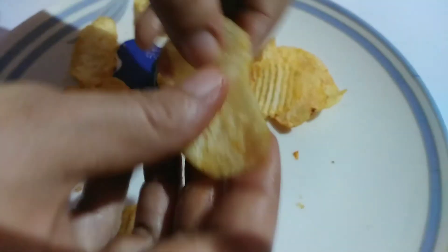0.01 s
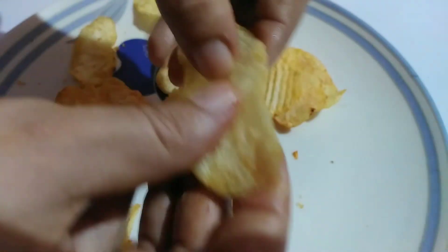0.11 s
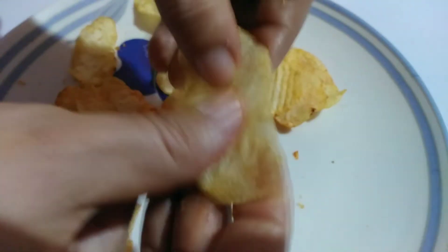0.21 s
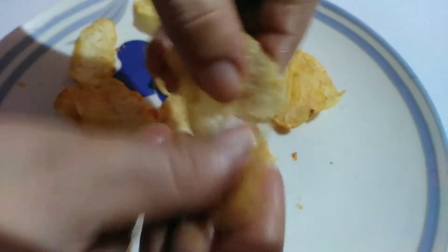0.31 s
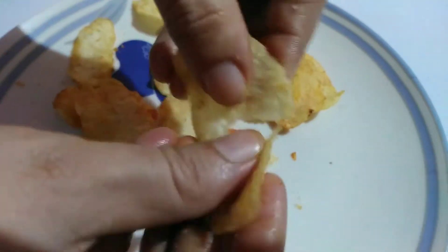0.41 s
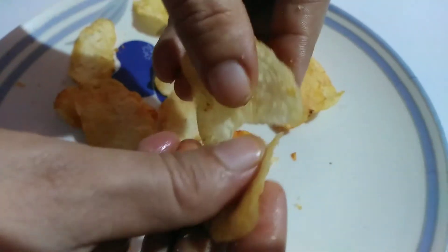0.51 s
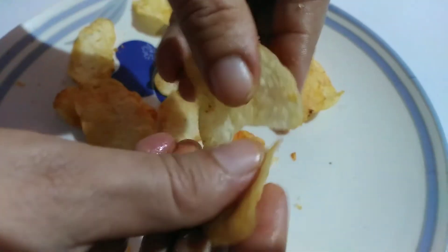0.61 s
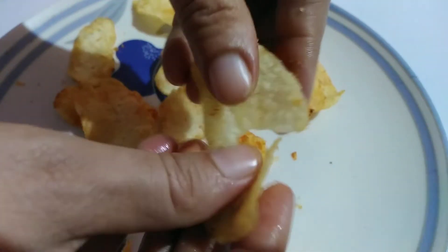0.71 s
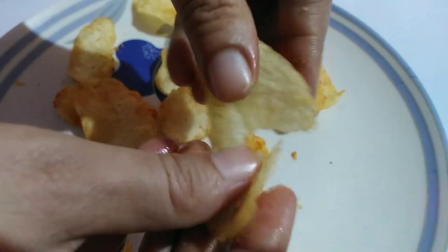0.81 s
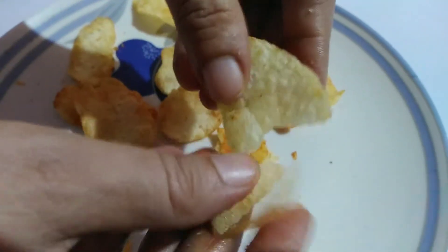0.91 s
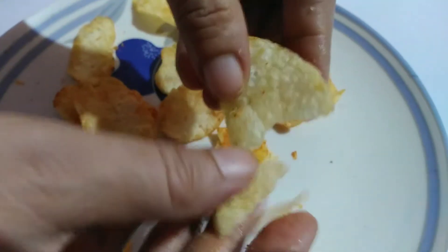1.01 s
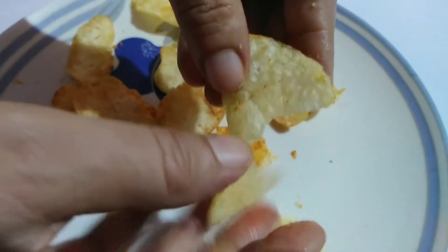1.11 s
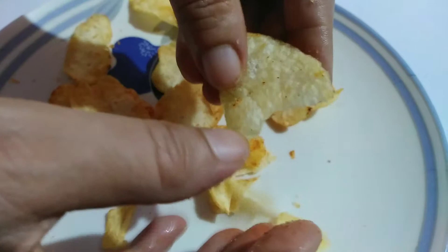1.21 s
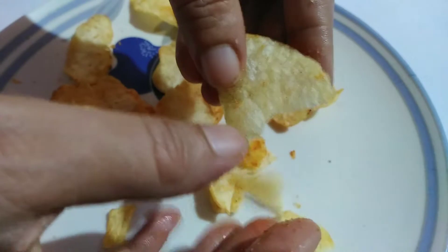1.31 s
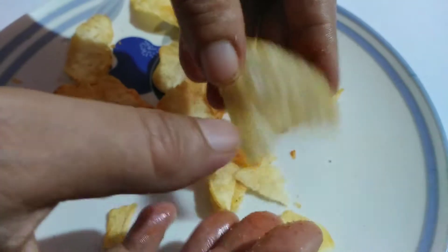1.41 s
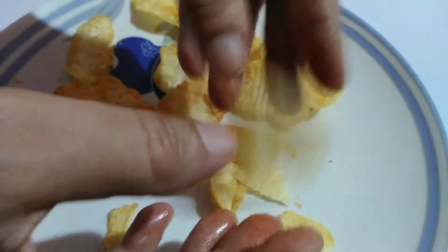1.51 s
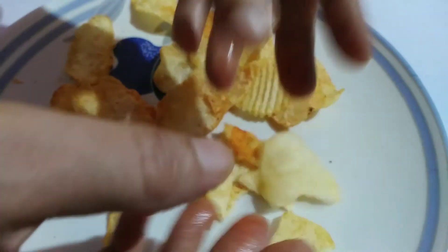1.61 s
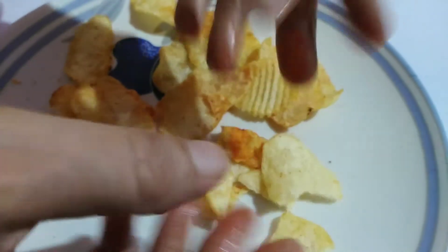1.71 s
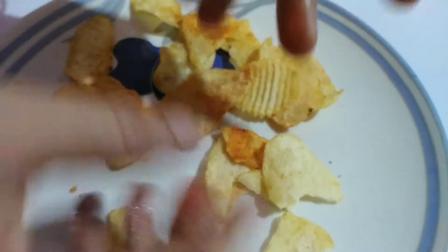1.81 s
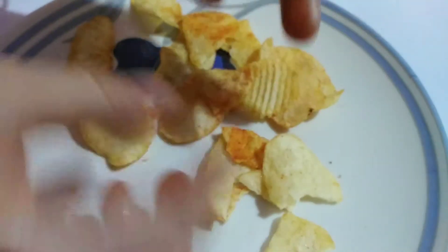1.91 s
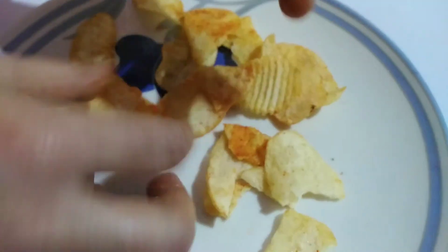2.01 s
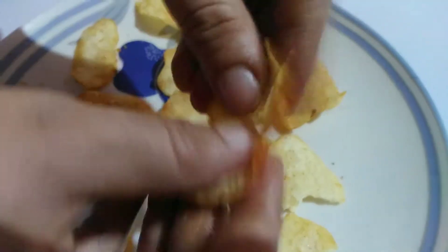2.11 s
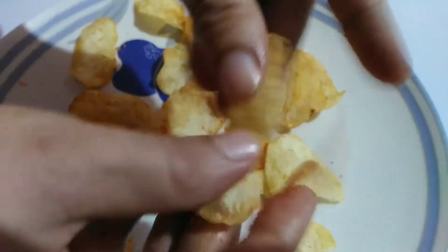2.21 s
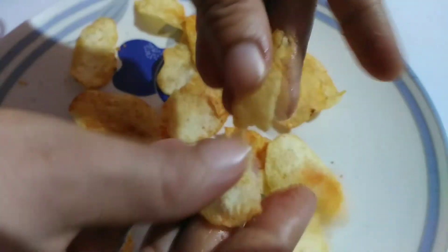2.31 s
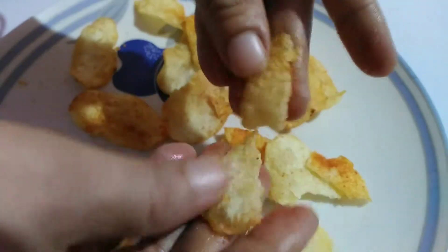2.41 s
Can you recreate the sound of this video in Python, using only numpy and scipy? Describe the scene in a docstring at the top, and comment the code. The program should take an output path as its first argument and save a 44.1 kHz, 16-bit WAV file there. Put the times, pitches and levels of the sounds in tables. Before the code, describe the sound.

A crisp chip snaps close to the microphone at about 0.25 seconds, a quick brittle crunch followed by a bright rustle. It creaks faintly between the fingers near 0.9 seconds. Pieces clatter lightly onto a plate from 1.1 to 1.7 seconds, and again from 2.3 seconds. The hands bump softly now and then, and a faint low motor hum runs behind in the small room.

```python
"""A crisp fried chip is snapped by hand just above a plate, close to the microphone in a small room.
After a faint rub it breaks at 0.25 s: a quick run of brittle fractures rings its damped modes.
A bright rustle follows; near 0.9 s it creaks between the fingers by stick-slip. Pieces then clatter,
mostly at 1.1-1.7 s and again from 2.3 s, each impact ringing both piece and plate.
Throughout, the hands bump softly now and then, and a motor hums faintly behind."""
import sys
import numpy as np
from scipy import signal
from scipy.fft import rfft, irfft
from scipy.io import wavfile
from scipy.ndimage import uniform_filter1d, minimum_filter1d

SR = 44100
rng = np.random.default_rng(int(sys.argv[2]) if len(sys.argv) > 2 else 0)


def wav_out(sig):
    """Save sig, one row per channel (or a flat mono array), as 16-bit PCM at SR to the path in sys.argv[1]."""
    wavfile.write(sys.argv[1], SR, np.round(np.clip(np.atleast_2d(sig).T, -1, 1) * 32767).astype(np.int16))


N = 110250
CHIP_T60_S = 0.021  # ringing of the cracked chip and of its crumbs


def amp(db):
    """Amplitude ratio of a level in decibels."""
    return 10 ** (np.asarray(db) / 20)


def unit(x):
    """Normalisation to rms 1."""
    return x / np.sqrt(np.mean(x ** 2))


def curve(points, hz):
    """Interpolation of (frequency [Hz], value) points on a logarithmic frequency axis."""
    p = np.array(points)
    return np.interp(np.log(hz + 1), np.log(p[:, 0]), p[:, 1])


def bins(size):
    """Frequencies [Hz] of a real Fourier transform."""
    return np.arange(size // 2 + 1) * SR / size


def colour(x, db):
    """Minimum-phase filter with a gain [dB] per bin, made causal by folding the cepstrum."""
    n = x.shape[-1]
    cepstrum = irfft(np.log(amp(db)), n)
    cepstrum[1:n // 2] *= 2
    cepstrum[n // 2 + 1:] = 0
    return irfft(rfft(x) * np.exp(rfft(cepstrum)), n)


def shape(x, db):
    """Whitening and filtering: a new spectral envelope [dB] that keeps the fine resonances."""
    power = uniform_filter1d((abs(rfft(x)) ** 2).mean(0), size=x.shape[1] // 64)
    return colour(x, db - 10 * np.log10(power))


def shelves(hz, body_db, treble_db, body_hz=3460, treble_hz=6750):
    """Size sets the spectrum [dB]: big pieces radiate more body, small splinters more treble."""
    return body_db / (1 + (hz / body_hz) ** 6) + treble_db / (1 + (treble_hz / (hz + 1)) ** 6)


def fade(t, t60):
    """Exponential damping, 60 dB in t60 seconds."""
    return np.exp(-np.log(1000) * t / t60)


def swell(middle, length):
    """Gaussian envelope, 17 dB down at both ends of its length [s]."""
    return np.exp(-2 * ((np.arange(N) / SR - middle) / (length / 2)) ** 2)


def add(out, x, start, db, pan_db=0):
    """Superposition of a stereo transient; its level is that of its energy packed into 4 ms."""
    x = x / np.sqrt((x ** 2).sum(1, keepdims=True) / (.004 * SR))
    gains = amp(db + np.array([[pan_db], [-pan_db]]) / 2)
    i = int(start * SR)
    out[:, i:i + x.shape[1]] += (x * gains)[:, :N - i]


def flake(t, t60, count=50, gap_hz=329.5, mic_spread_rad=1.945):
    """Bending modes of a thin flake: about evenly spaced, damped, phased apart at the microphones."""
    detune, strength, damping, mic_phase = rng.standard_normal((4, count, 1))
    hz = gap_hz * (np.arange(count)[:, None] + 1 + 0.28 * detune)
    phase = 2 * np.pi * hz * t + rng.uniform(0, 2 * np.pi, (count, 1))
    envelopes = amp(strength) * fade(t, t60 * np.exp(.2 * damping))
    return np.array([(envelopes * np.sin(phase + p)).sum(0) for p in (0, mic_spread_rad * mic_phase)])


def cracks(size=2048, jump_count=10):
    """Brittle fracture: each crack advances in tiny jumps, impulses that excite the chip's modes."""
    # cracks in the chip: (time [s], level [dB], duration [s], body [dB], treble [dB])
    fractures = [(0.2308, -39, 0.00024, -9, 11), (0.2435, -13.5, 0.00051, -9.5, -11),
                 (0.251, -6.5, 0.0012, -4, 0.5), (0.2546, -30, 0.0011, 0, -14),
                 (0.262, -19.5, 0.011, -8, -16), (0.2725, -12, 0.0024, 0, 5.5),
                 (0.2782, -20.5, 0.0019, -2.5, 2), (0.2925, -20.5, 0.0028, -4.5, -30),
                 (0.556, -45, 0.0019, 12, 5.5), (0.596, -38.5, .001, -55, 7), (1.249, -37, 0.002, -8, 4),
                 (1.308, -38.5, 0.0025, -10, 19), (2.118, -50.5, 0.00053, -5, 20.5)]
    # spectral envelope of a crack: (frequency [Hz], gain [dB])
    spectrum = [(130, -35), (450, -20.5), (1000, -13), (1500, -9), (3000, -2.5), (5500, -1.5), (8000, -4),
                (15000, -15.5)]
    out, t, hz = np.zeros((2, N)), np.arange(size) / SR, bins(size)
    for start, db, length, body, treble in fractures:
        jumps = np.zeros(size)
        jump_s = (np.arange(jump_count) + rng.random(jump_count)) / jump_count * length
        jumps[(jump_s * SR).astype(int)] = rng.choice([-1, 1], jump_count)
        ringing = irfft(rfft(flake(t, CHIP_T60_S)) * rfft(jumps))
        add(out, shape(ringing, curve(spectrum, hz) + shelves(hz, body, treble)), start, db)
    return out


def ring(t, hz, t60):
    """Damped oscillator: one mode, in quadrature at the two microphones."""
    phase = 2 * np.pi * hz * t + rng.uniform(0, 2 * np.pi) + np.array([[0], [np.pi / 2]])
    return unit(np.sin(phase) * fade(t, t60))


def taps(size=2048, contact_s=0.00042, ring_db=-4.5, crumb_count=7, crumb_db=-17.5, settle_s=0.048):
    """Impact excitation: a landing piece rings, one mode above the rest; then crumbs settle."""
    # pieces hitting the plate and each other: (time [s], level [dB], low edge of the modes [Hz],
    # body [dB], treble [dB], strong mode [Hz], left minus right [dB])
    impacts = [(0.636, -46.5, 2000, -10, 13, 5510, -5.5), (1.0750, -17.5, 1247, 8, -4, 5160, -5.5),
               (1.084, -26.5, 1350, -13, -6, 5170, 12.5), (1.1085, -24.5, 1370, 4.5, 7.5, 2250, 3.5),
               (1.1742, -31.5, 1400, -8, 9.5, 5400, 2), (1.222, -39.5, 2200, -10, 2.5, 5030, -0.5),
               (1.257, -18.5, 2060, -7, -3, 5170, 0), (1.381, -32, 1810, -1.5, 5, 4560, -0.5),
               (1.5679, -23, 1975, 4, 2.5, 4760, -1), (1.5844, -21, 710, 6, 6.5, 4570, 2.5),
               (1.6180, -34, 1900, 9, 10, 2550, 1), (1.639, -14.5, 1580, 3.5, -1, 5245, -0.5),
               (1.6939, -29.5, 2280, 1.5, -2, 3250, 0), (1.7118, -34.5, 2230, 0, 0, 2330, 1.5),
               (2.2996, -30, 1560, 9, 12.5, 3070, -4.5), (2.3276, -30.5, 1400, 1, 7, 3160, -3),
               (2.3428, -22.5, 2350, -22, -5, 5750, 3.5), (2.4107, -23.5, 2070, -7.5, 10.5, 4580, -1),
               (2.4550, -33, 2040, -7.5, 2.5, 4470, 6)]
    # spectral envelope of a piece: (frequency [Hz], gain [dB])
    spectrum = [(150, -14.5), (600, -15.5), (1400, -9.5), (2400, 0.5), (3400, -1.5), (5300, -7),
                (7500, -13), (12000, -21), (15000, -33)]
    out, t, hz = np.zeros((2, N)), np.arange(size) / SR, bins(size)
    contact = 1 - np.exp(-t / contact_s)
    for start, db, low_hz, body, treble, ring_hz, pan in impacts:
        bass_cut_db = -17 / (1 + (hz / (.8 * low_hz)) ** 8)
        tone = curve(spectrum, hz) + shelves(hz, body, treble) + bass_cut_db
        piece = unit(shape(flake(t, t60=0.018) * contact, tone))
        strong_mode = amp(ring_db) * ring(t, ring_hz, t60=0.019)
        add(out, piece + contact * (strong_mode + plate(t, body, treble)), start, db, pan)
        for late in rng.random(crumb_count):  # later crumbs are softer
            crumb = shape(flake(t, CHIP_T60_S), tone - shelves(hz, body, 0))
            landing_s = min(start + late * settle_s, (N - 1) / SR)
            add(out, crumb, landing_s, db + crumb_db - 10 * late, pan)
    return out


def plate(t, body, treble, t60=0.044, detune=0.016):
    """Modal response of the plate: levels and pitches vary slightly with the spot that is hit."""
    # modes of the plate with chips lying on it: (frequency [Hz], relative level [dB])
    modes = [(620, -38), (1440, -22.5), (1860, -18), (2120, -19), (2490, -10.5), (5190, -13.5)]
    spot = rng.uniform(-1.13, 1, (len(modes), 2))
    return sum(amp(db + shelves(hz, body, treble) + louder_db) * ring(t, hz * (1 + detune * higher), t60)
               for (hz, db), (louder_db, higher) in zip(modes, spot))


def rubs():
    """Friction noise: skin drags over the rough crust in a fine crackle, loudest just after the snap."""
    # finger strokes: (centre time [s], duration [s], level [dB])
    strokes = [(-0.015, 0.16, -52.5), (0.35, 0.1502, -41), (0.669, 0.043, -56), (0.81, 0.068, -62.5),
               (2.125, 0.086, -63.5)]
    # tone of the bright, hissy rustle, strongest above 5 kHz: (frequency [Hz], gain [dB])
    rustle_tone = [(900, -12.5), (4700, 1.5), (5400, 10.5), (10000, 5), (15000, -1.5)]
    noise = rng.standard_normal((2, N))
    grains = np.repeat(rng.standard_normal(N // 40 + 1), 40)  # about 1 ms each
    roughness_db = 5 * uniform_filter1d(grains, size=8)[:N]
    crackle = unit(colour(noise * amp(roughness_db), curve(rustle_tone, bins(N))))
    return crackle * sum(amp(db) * swell(middle, length) for middle, length, db in strokes)


def slide(modes_hz=(3080, 3490), bandwidth_hz=170, db=-64):
    """Stick-slip friction: tiny slips of a fingertip excite two resonances of the chip."""
    slips = rng.standard_normal((2, N)) ** 3
    creak = sum(signal.lfilter(*signal.iirpeak(hz, hz / bandwidth_hz, fs=SR), slips) for hz in modes_hz)
    return unit(creak) * amp(db) * swell(middle=0.91, length=0.24)


def bumps(hz=58):
    """Soft impacts hold only low frequencies: dull thuds as the hands jerk and touch down."""
    # bumps of the hands: (centre time [s], duration [s], level [dB])
    thuds = [(0.281, 0.019, -48), (0.94, 0.07, -57.5), (1.706, 0.16, -64), (2.451, 0.12, -60)]
    t = np.arange(N) / SR
    return sum(amp(db) * swell(middle, length) * np.sqrt(2) * np.cos(2 * np.pi * hz * (t - middle))
               for middle, length, db in thuds)


def room(x, size=16384, bands=8, onset_s=0.0062, early_db=-7.5):
    """Reverberation: dense early reflections, then a short tail that lasts longest in the treble."""
    # decay of the room: (frequency [Hz], reverberation time [s])
    decay = [(2000, 0.12), (5300, 0.245), (12000, 0.21)]
    # spectral envelope of the reflections: (frequency [Hz], gain [dB])
    spectrum = [(300, -1), (2200, -4.5), (4200, -10.5), (5800, -4.5), (8000, -8.5), (15000, -6)]
    t, hz = np.arange(size) / SR, bins(size)
    noise = rfft(rng.standard_normal((2, size)))
    centres_hz = np.geomspace(500, 14000, bands)
    tail = sum(irfft(noise * curve(np.c_[centres_hz, band], hz)) * fade(t, curve(decay, centre))
               for centre, band in zip(centres_hz, np.eye(bands)))
    early = amp(early_db) * rng.standard_normal((2, size)) * fade(t, t60=0.12)
    echoes = (tail + early) * np.clip(t / onset_s - .5, 0, 1)
    response = colour(unit(echoes) / np.sqrt(size), curve(spectrum, hz))
    return signal.fftconvolve(x, response, axes=1)[:, :N]


def motor(waver_db=0.9, waver_rad=0.11, knots=20):
    """Tonal hum of a motor: each partial wavers by slow random amplitude and phase modulation."""
    # partials of the hum: (frequency [Hz], level [dB])
    partials = [(59, -75), (173, -68.5), (194, -60.5), (388, -76), (582, -78.5)]
    t, hum = np.arange(N) / SR, np.zeros(N)
    waver = lambda: np.interp(t, np.linspace(0, t[-1], knots), rng.standard_normal(knots))
    for hz, db in partials:
        peak = np.sqrt(2) * amp(db + waver_db * waver())
        hum += peak * np.sin(2 * np.pi * (hz * t + rng.random()) + waver_rad * waver())
    return hum


def air(mid_db=-64, side_ratio_db=-5):
    """Ambient noise: quiet room air, partly coherent between the two microphones."""
    # spectral envelope of the air: (frequency [Hz], gain [dB])
    spectrum = [(25, -27.5), (55, -10.5), (125, -4), (310, -6), (520, -17), (2500, -19.5), (6000, -29),
                (15000, -45)]
    mid, side = (unit(colour(rng.standard_normal(N), curve(spectrum, bins(N)))) for _ in range(2))
    return amp(mid_db) * (mid + amp(side_ratio_db) * side * np.array([[1], [-1]]))


def scene():
    """Superposition of the chip's direct sound, its reverberation, the bumps and the background."""
    snap, clatter, rub = cracks(), taps(), rubs()
    direct = snap + clatter + rub + slide()
    reverberation = room(amp(-4) * (snap + rub) + amp(-0.5) * clatter)
    return direct + reverberation + bumps() + motor() + air()


def record(dry, ceiling=1, limiter_s=.002, cutoff_hz=15800):
    """Transduction: two microphones of unequal response, a fast peak limiter and a steep low-pass."""
    # difference between the microphones: (frequency [Hz], left minus right [dB])
    balance = [(200, -1.5), (800, 0), (2200, 1), (5000, 7), (13000, 0)]
    tilt = curve(balance, bins(N)) / 2
    heard = np.array([colour(dry[0], tilt), colour(dry[1], -tilt)])
    span = int(limiter_s * SR)
    needed_gain = ceiling / np.maximum(abs(heard).max(0), ceiling)
    gain = uniform_filter1d(minimum_filter1d(needed_gain, span), span)
    return signal.sosfilt(signal.ellip(12, .2, 80, cutoff_hz, fs=SR, output="sos"), heard * gain)


dry = scene()
out = record(dry)
wav_out(out)
```